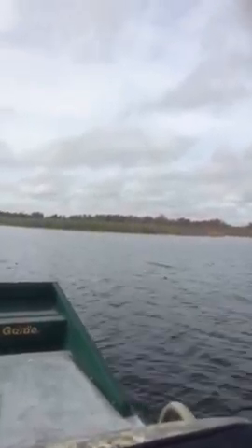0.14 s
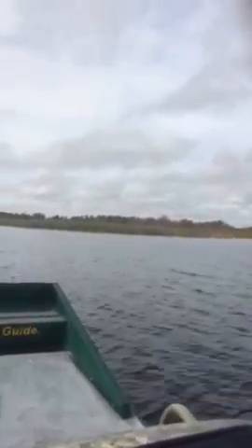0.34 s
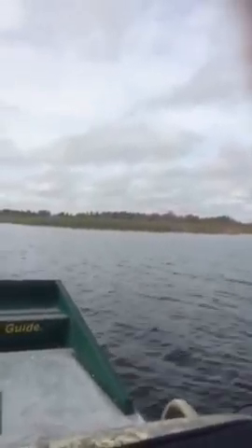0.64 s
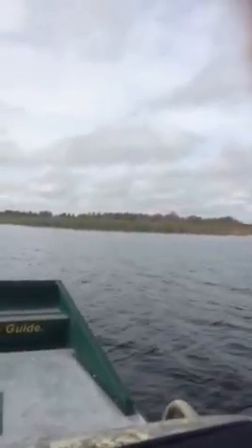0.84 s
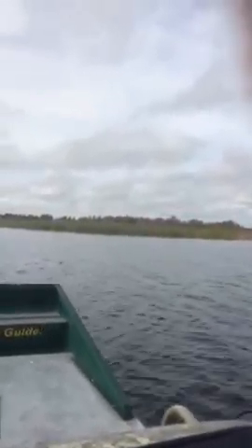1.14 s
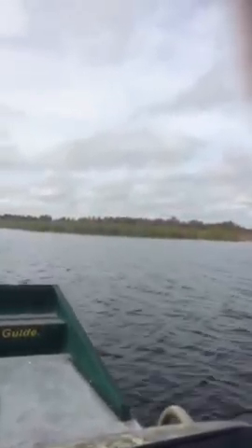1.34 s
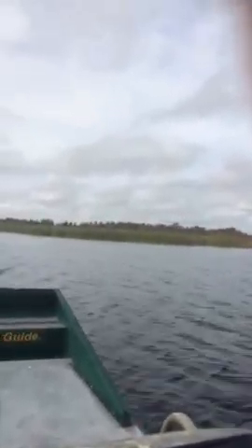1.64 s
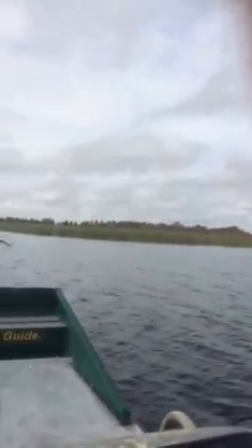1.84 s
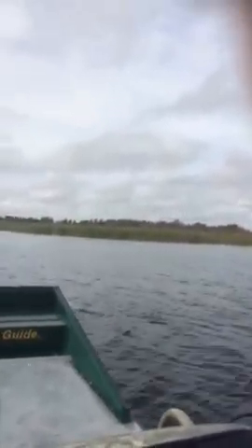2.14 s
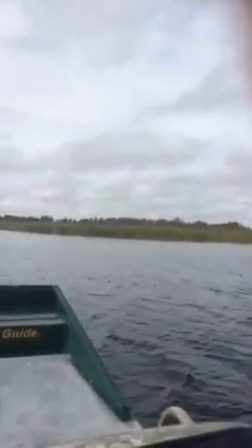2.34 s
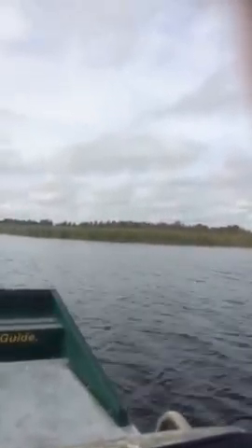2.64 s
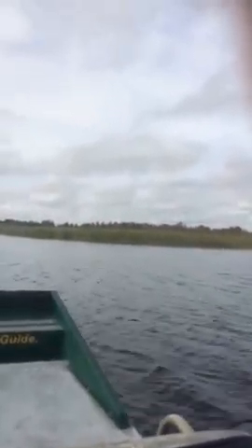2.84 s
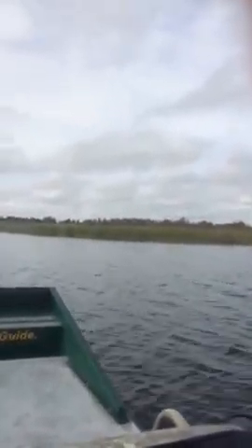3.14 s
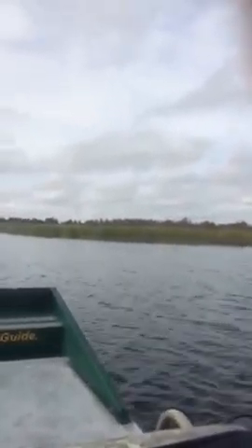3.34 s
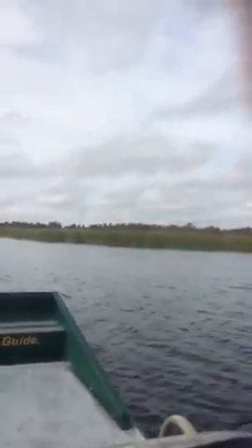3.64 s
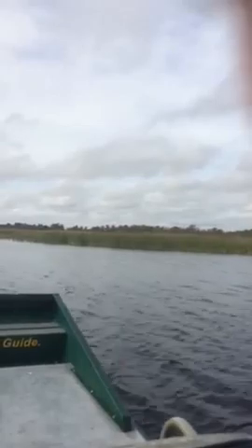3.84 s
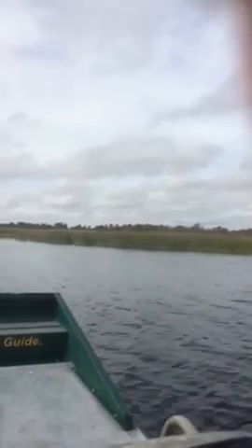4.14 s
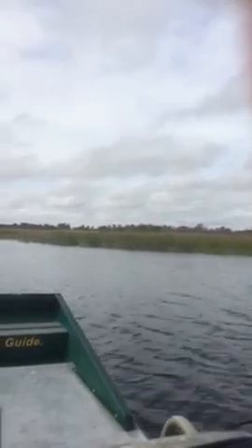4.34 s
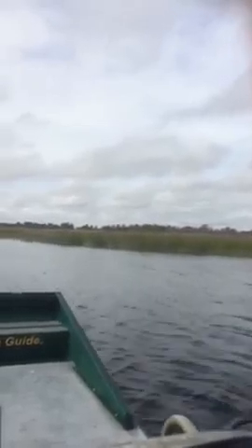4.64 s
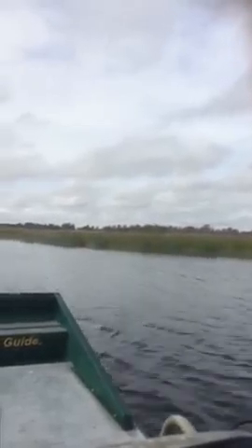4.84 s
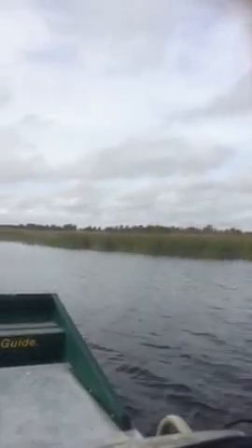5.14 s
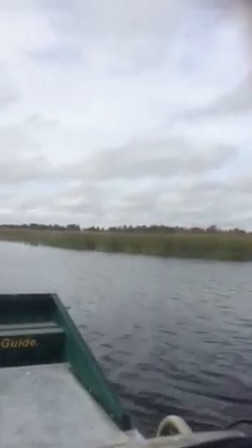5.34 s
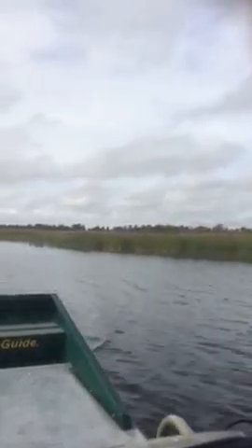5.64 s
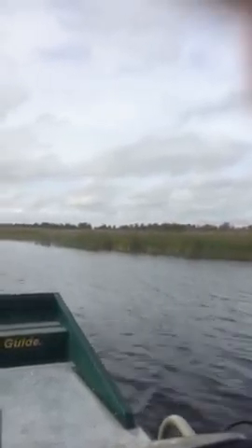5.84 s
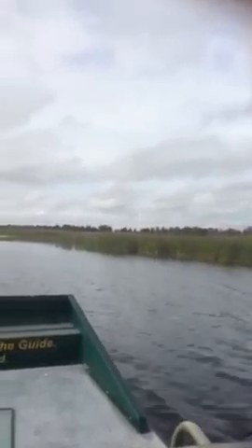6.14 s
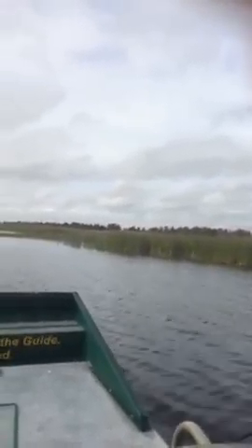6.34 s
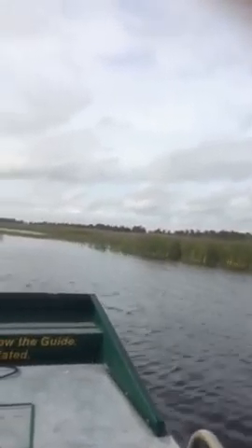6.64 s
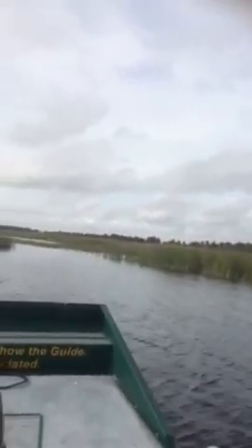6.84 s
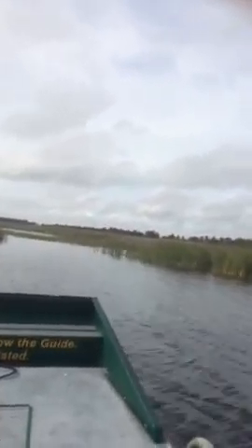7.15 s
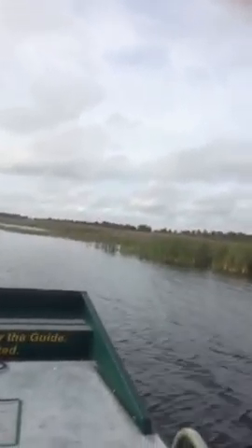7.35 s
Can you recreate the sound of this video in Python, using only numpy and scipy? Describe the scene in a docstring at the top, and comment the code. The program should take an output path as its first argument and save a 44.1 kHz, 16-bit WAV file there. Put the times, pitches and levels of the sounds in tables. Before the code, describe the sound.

From 0 to 7.5 seconds, an airboat runs at speed over open water, heard in mono from a seat just ahead of the engine. A loud V8 drone, strongest around 125 and 200 Hz, merges with a deep propeller throb near 85 Hz and its harmonics. Gusty midrange roar and blade-tip hiss surround it, with low wind buffets thudding on the microphone, notably near 0.2, 3.2, 3.5 and 5.6. Short dry exhaust pops crackle irregularly, clearer around 0.5, 1.4, 2.4, 3.0 and 4.5. A faint belt whine near 2.4 kHz wavers, surfacing around 2.5, 3.0 and 5.2. Pitch eases down by about a semitone by 7 seconds; after 5 the roar and hiss thin slightly and the upper engine hum stands out more. Level stays dense and limited, cutting off while still running.

```python
"""A gusty roar meets the ear first, aboard an airboat at speed on open water, with exhaust orders and blade tones on it.
A V8 turns a four-blade air propeller through a toothed belt: each is a set of sines locked to the engine cycle.
Wind, roar and blade-tip hiss are banded noise: wind buffets the microphone, roar and blade-tip hiss gust together.
The microphone hisses steadily. The exhaust pops in short bursts of kicks that ring pipe modes.
The recorder's limiter pulls everything down at each peak over full scale."""
import sys
import numpy as np
from scipy import signal
from scipy.io import wavfile
from scipy.ndimage import uniform_filter1d, minimum_filter1d

SR = 44100
rng = np.random.default_rng(int(sys.argv[2]) if len(sys.argv) > 2 else 0)


def master(y):
    """Save y as 16-bit WAV."""
    cut = np.clip(np.atleast_2d(y).T, -1, 1)
    pcm = np.round(cut * 32767)  # scale
    wavfile.write(sys.argv[1], SR, pcm.astype(np.int16))


N = 330750

# Engine speed: (time [s], firing cycles per second [Hz]); a cycle is two crank turns
ENGINE_SPEED = [(0.0, 25.4), (0.75, 25.21), (1.5, 25.21), (2.0, 25.07), (2.5, 24.65), (2.8, 24.62),
                (3.75, 24.84), (4.25, 24.79), (5.0, 24.35), (6.0, 23.82), (6.3, 23.57), (7.0, 23.45),
                (7.5, 23.51)]

# Air levels before each layer's trim: (time [s], wind on the microphone [dB], propeller roar [dB], blade-tip hiss [dB])
AIR_LEVELS = [(0.0, -28, -23.5, -32), (0.45, -20, -24.5, -32), (0.9, -20, -23, -31),
              (1.3, -25.5, -24.5, -31.5), (2.0, -19.5, -26.5, -31.5), (2.9, -24, -24.5, -31.5),
              (3.5, -22.5, -24, -31.5), (4.2, -22, -24.5, -31.5), (5.0, -22, -24.5, -33),
              (5.8, -25.5, -27, -35.5), (6.4, -23, -27, -37), (7.0, -24.5, -26, -34.5),
              (7.5, -29, -28, -35.5)]
# Noise colours, relative levels: (frequency [Hz], density [dB per Hz])
WIND_SPECTRUM = [(14, -25), (25, -18), (35, -6), (50, 0.5), (65, 2.5), (100, -3.5), (140, 0.5), (190, 1.5),
                 (250, -11), (400, -27), (800, -38)]
ROAR_SPECTRUM = [(120, -14.5), (230, -2.5), (330, 1.5), (430, -1), (700, -6.5), (1000, -10), (1400, -16.5),
                 (1750, -17), (2200, -25), (4000, -38)]
HISS_SPECTRUM = [(800, 0), (1500, 3), (2200, -0.5), (3500, -1.5), (6000, -4), (8500, -8), (10300, -16),
                 (11300, -19), (13000, -17), (15500, -16.5)]
# Buffets on the microphone, negative ones dip: (time [s], change of the wind level [dB])
WIND_BUFFETS = [(0.19, 14), (0.35, 9), (0.77, 6.5), (0.92, -3.5), (3.15, 8), (3.26, -2), (3.51, 9),
                (3.8, 1), (4.43, 6.5), (4.82, 7), (5.6, 9), (5.72, 3), (6.31, 5)]
# Disturbed air through the blades, before each layer's depth: (time [s], change of level [dB])
AIR_SWELLS = [(0.23, 2.5), (0.54, 6), (0.65, 2), (1.46, 1.5), (1.57, 0.5), (1.71, 2), (1.84, 0),
              (2.09, 2.5), (2.41, 3), (2.82, -1), (3.04, 1), (3.17, 2), (3.28, 5), (3.9, 1.5), (4.28, -1),
              (4.55, -0.5), (4.89, -0.5), (5.58, 4), (6.78, 0), (7.19, 0.5)]

# Belt tooth whine: (time [s], level [dB])
BELT_WHINE = [(0.0, -55), (1.25, -50), (2.3, -49), (2.45, -40), (2.75, -59), (3.0, -42), (3.5, -49),
              (4.2, -49), (4.5, -45), (4.8, -56), (5.2, -42), (5.5, -58), (6.0, -47.5), (6.75, -64),
              (7.5, -55)]

# Blade tone: (time [s], level [dB])
BLADE_TONE = [(0.0, -16), (0.6, -26.5), (1.3, -19.5), (2.0, -19), (2.5, -24), (2.75, -20), (3.25, -21),
              (3.5, -26), (3.8, -18.5), (4.6, -21), (5.25, -39), (5.75, -30), (6.0, -36), (6.3, -23),
              (6.75, -27.5), (7.15, -20), (7.5, -33)]
# Higher blade harmonics: (harmonic [number], level at highest speed [dB], level at lowest speed [dB])
HIGH_BLADE_HARMONICS = [(3, -22.5, -38), (4, -39.5, -54), (5, -33.5, -50.5), (6, -37, -34), (7, -46, -39.5),
                        (8, -38, -43), (9, -41, -60.5), (10, -37, -50), (12, -47, -55), (13, -46.5, -54.5),
                        (15, -43, -78)]

# Exhaust pops before the trims: (time [s], crack level [dB], thump level [dB])
EXHAUST_POPS = [(0.034, -11, -14), (0.53, -4, -5.5), (0.622, -16, -21), (0.91, -16, -12), (0.963, -10, -15),
                (1.055, -10, -12), (1.115, -17, -8.5), (1.385, -6, -16), (1.824, -10.5, -15),
                (2.061, -10, -15), (2.322, -11.5, -17), (2.386, -6, -14), (3.028, -2.5, -14),
                (3.24, -17, -17.5), (3.556, -7, -15), (3.65, -8, -33), (3.911, -5.5, -12),
                (4.142, -13, -14), (4.532, -8, -22), (4.547, -5.5, -21), (4.759, -14, -23),
                (5.003, -7, -13), (5.566, -8, -30), (5.649, -8, -10), (5.938, -12.5, -31),
                (6.551, -14, -20), (6.772, -10.5, -23), (6.802, -13.5, -11), (6.908, -15.5, -20),
                (7.13, -9, -24), (7.379, -15, -12), (7.387, -11, -7)]
# Pipe modes, the thump first and then the crack: (frequency [Hz], bandwidth [Hz], level [dB])
PIPE_MODES = [(454, 120, 5.5), (825, 360, -0.5), (1550, 460, -4.5), (2280, 480, -8.5), (3340, 950, -9.5)]

# The two loud exhaust orders: (time [s], 8th order level [dB], 5th order level [dB])
LOUD_ORDERS = [(0.0, -14.5, -17), (0.25, -12, -12), (0.75, -12.5, -17), (1.25, -12.5, -14.5),
               (2.0, -14, -12), (2.5, -11, -10), (3.25, -10.5, -9.5), (3.5, -12.5, -11.5),
               (4.1, -11.5, -12), (4.5, -11.5, -12), (5.0, -8.5, -10.5), (5.75, -6.5, -12.5),
               (6.5, -8.5, -13.5), (7.25, -5, -15), (7.5, -9.5, -17)]
# The 11th exhaust order: (time [s], level [dB])
ELEVENTH_ORDER = [(0.0, -27), (2.0, -24.5), (2.6, -19.5), (4.75, -23), (5.75, -45), (6.5, -29.5),
                  (7.5, -24)]
# Weaker exhaust orders: (order [per cycle], level at highest speed [dB], level at lowest speed [dB])
WEAK_ORDERS = [(4, -24.5, -24), (6, -26, -28), (9, -35, -34), (10, -25.5, -40.5), (12, -29, -47),
               (13, -48.5, -35), (14, -33.5, -36.5), (15, -41, -54.5), (16, -49, -39.5), (24, -50, -38.5),
               (32, -47, -48)]

BLADE_PASSES_PER_CYCLE = 3.4907   # four blades behind the belt reduction
TEETH_PER_CYCLE = 96.05


def amp(db):
    """Gain of a level in dB."""
    return 10 ** (np.asarray(db) / 20)


def rms_one(x):
    """Signal scaled to rms 1."""
    return x / np.sqrt(np.mean(x ** 2) + 1e-20)


def in_time(rows):
    """Level columns of a time table, drawn as one value per sample."""
    times, *columns = np.transpose(rows)
    return [np.interp(np.arange(N) / SR, times, column) for column in columns]


def bumps(rows, half_width_s):
    """Bell-shaped rises and dips in dB, down to 1/e at the half-width."""
    t = np.arange(0, N, 50) / SR
    curve_db = sum(rise_db * np.exp(-((t - s) / half_width_s) ** 2) for s, rise_db in rows)
    return np.interp(np.arange(N) / SR, t, curve_db)


def drift(rate_hz):
    """Random wander of rms 1: noise through two equal low-pass poles at rate_hz."""
    step = 20   # samples between points of the slow curve
    pole = np.exp(-2 * np.pi * rate_hz * step / SR)
    settle = 4000   # points dropped while the filter settles
    noise = rng.standard_normal(N // step + settle + 2)
    slow = signal.lfilter([1], [1, -2 * pole, pole * pole], noise)[settle:]
    return np.interp(np.arange(N) / step, np.arange(len(slow)), rms_one(slow))


def tone(turns, level_db, waver_db):
    """Shaft-locked sine about an rms level, wavering and fluttering as the air path changes."""
    waver = 0.76 * drift(5.4) + 0.53 * drift(21.7)
    gain = np.sqrt(2) * amp(level_db + waver_db * waver)
    return gain * np.sin(2 * np.pi * (turns + rng.random()))


def stack(turns, rows, waver_db):
    """Multiples of a shaft rate whose levels slide with the engine speed."""
    speed, = in_time(ENGINE_SPEED)
    slowed = (speed.max() - speed) / np.ptp(speed)   # 0 at the highest speed, 1 at the lowest
    out = 0
    for multiple, fast_db, slow_db in rows:
        level_db = fast_db + (slow_db - fast_db) * slowed
        out = out + tone(multiple * turns, level_db, waver_db)
    return out


def turbulence(spectrum, gust_db, patchy_db, count):
    """Noise bands, count to the octave, that share a gust and flicker on their own; rms 1."""
    hz, level_db = np.transpose(spectrum)
    octaves = np.arange(0, np.log2(hz[-1] / hz[0]) + .3, 1 / count)
    edges = hz[0] * 2 ** octaves
    white = rng.standard_normal((2, N))   # neighbouring bands use different noise
    out = 0
    for k, (low, high) in enumerate(zip(edges, edges[1:])):
        band_pass = signal.butter(2, [low, min(high, .45 * SR)], "band", fs=SR, output="sos")
        band = signal.sosfilt(band_pass, white[k % 2])
        centre_db = np.interp(np.log(low * high) / 2, np.log(hz), level_db)
        out = out + amp(centre_db + gust_db + patchy_db * drift(10.3)) * band
    return rms_one(out)


def microphone_hiss():
    """Steady microphone hiss: high-passed noise above 10.5 kHz."""
    high_pass = signal.butter(4, 10500, "high", fs=SR, output="sos")
    return amp(-53) * signal.sosfilt(high_pass, rng.standard_normal(N))


def wind(level_db):
    """Lumpy low noise of wind on the microphone, with its own gusts and buffets."""
    gust_db = 0.97 * drift(3.9) + 1.27 * drift(44.0)
    noise = turbulence(WIND_SPECTRUM, gust_db, patchy_db=3.0, count=3)
    return amp(level_db + 4.5 + bumps(WIND_BUFFETS, half_width_s=0.041)) * noise


def roar(level_db, gust, swell):
    """Propeller roar: mid-range turbulence lifted by gusts and disturbed air."""
    gust_db = 1.02 * gust + 1.56 * swell + 1.5 * drift(41.0)
    return amp(level_db + 1.72) * turbulence(ROAR_SPECTRUM, gust_db, patchy_db=1.4, count=3)


def blade_hiss(level_db, gust, swell, cycles):
    """Blade-tip hiss: high turbulence that gusts with the roar and pulses as the banks fire unevenly."""
    once_a_cycle = 0.29 * np.sin(2 * np.pi * cycles)
    thrice_a_cycle = 0.51 * np.sin(6 * np.pi * cycles)
    gust_db = gust + once_a_cycle + thrice_a_cycle + swell
    return amp(level_db + 2.17) * turbulence(HISS_SPECTRUM, gust_db, patchy_db=0.18, count=3)


def air(cycles):
    """Wind and microphone hiss, with roar and blade-tip hiss sharing gusts and swells of disturbed air."""
    wind_db, roar_db, hiss_db = in_time(AIR_LEVELS)
    gust = 0.28 * drift(30.0) + 1.76 * drift(200.0)
    swell = bumps(AIR_SWELLS, half_width_s=0.016) + 0.71 * drift(71.0)
    blades = roar(roar_db, gust, swell) + blade_hiss(hiss_db, gust, swell, cycles)
    return microphone_hiss() + wind(wind_db) + blades


def belt(cycles):
    """Tooth mesh whine; the crank turns twice a cycle and throws a side tone below and above."""
    waver_db = 3.5
    whine = tone(TEETH_PER_CYCLE * cycles, in_time(BELT_WHINE)[0], waver_db)
    lower = tone((TEETH_PER_CYCLE - 2) * cycles, -54, waver_db)
    upper = tone((TEETH_PER_CYCLE + 2) * cycles, -56, waver_db)
    return whine + lower + upper


def propeller(cycles):
    """Each passing blade is a pressure pulse, built as a stack of harmonics."""
    passes = BLADE_PASSES_PER_CYCLE * cycles
    level_db, = in_time(BLADE_TONE)
    blade_tone = tone(passes, level_db, waver_db=1.43)
    second = tone(2 * passes, level_db + 2.15, waver_db=1.3)
    return blade_tone + second + stack(passes, HIGH_BLADE_HARMONICS, waver_db=3.5)


def pops():
    """Exhaust pops: a thump and a ragged crack, every pipe mode ringing to soft kicks of its own."""
    times, crack_db, thump_db = np.transpose(EXHAUST_POPS)[:, :, None]
    burst_s = 0.009   # the kicks of a pop fall within this time
    out = 0
    for k, (hz, width_hz, mode_db) in enumerate(PIPE_MODES):
        if k == 0:   # the thump
            kick_count, level_db = 2, thump_db - 3.0
        else:
            kick_count, level_db = 7, crack_db - 5.5
        place = rng.random((len(EXHAUST_POPS), kick_count))
        place[:, 0] *= .15   # one kick always falls early in the pop
        strength_db = level_db + mode_db + rng.normal(0, 1.4, place.shape)
        kicks = np.zeros(N)
        kicks[((times + burst_s * place) * SR).astype(int)] = amp(strength_db)
        decay = np.exp(-np.pi * width_hz / SR)
        angle = 2 * np.pi * hz / SR
        poles = [1, -2 * decay * np.cos(angle), decay * decay]
        ring = signal.lfilter([0, np.sin(angle)], poles, kicks + 1e-18)
        out = out + (-1) ** k * ring   # modes alternate in polarity
    return signal.sosfilt(signal.butter(2, 3500, fs=SR, output="sos"), out)


def exhaust(cycles):
    """Eight firings a cycle give the 8th order; uneven banks add the other orders."""
    eighth_db, fifth_db = in_time(LOUD_ORDERS)
    loud = tone(8 * cycles, eighth_db, waver_db=1.24) + tone(5 * cycles, fifth_db, waver_db=1.24)
    eleventh = tone(11 * cycles, in_time(ELEVENTH_ORDER)[0], waver_db=2.3)
    return loud + eleventh + stack(cycles, WEAK_ORDERS, waver_db=2.5)


def scene():
    """Everything heard from a seat ahead of the engine."""
    cycles = np.cumsum(in_time(ENGINE_SPEED)[0]) / SR
    mix = air(cycles) + belt(cycles) + propeller(cycles) + pops() + exhaust(cycles)
    return mix[None]


def limiter(x, drive_db, release_db_s, attack_s):
    """Gain drops just ahead of any driven peak over full scale and recovers at a steady dB rate."""
    over_db = np.maximum(20 * np.log10(np.abs(x) + 1e-9) + drive_db, 0)
    ramp = release_db_s * np.arange(N) / SR
    held_db = np.maximum.accumulate(over_db + ramp) - ramp
    span = max(round(attack_s * SR), 1)
    widened_db = -minimum_filter1d(-held_db, size=span)   # reaches ahead of each peak
    reduction_db = uniform_filter1d(widened_db, size=span)
    return x * amp(drive_db - reduction_db)


def record(dry):
    """Recorder: the limiter, then a steep cut of the top and a clip at full scale."""
    limited = limiter(dry[0], drive_db=2.0, release_db_s=121.0, attack_s=0.0039)
    top_cut = signal.ellip(14, .05, 70, 15240, fs=SR, output="sos")   # ripple and stop band in dB, edge in Hz
    return np.clip(signal.sosfilt(top_cut, limited), -1, 1)[None]


dry = scene()
out = record(dry)
master(out)
```